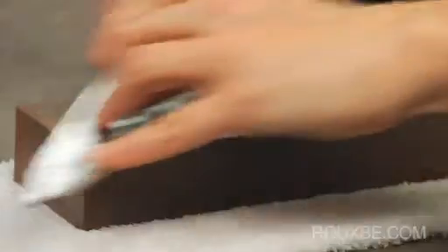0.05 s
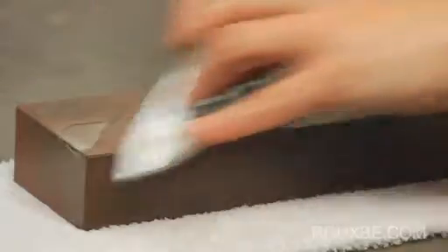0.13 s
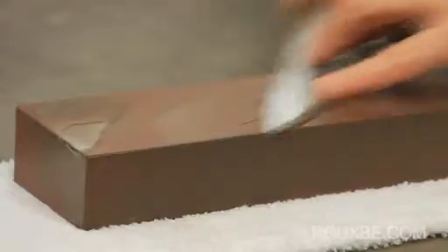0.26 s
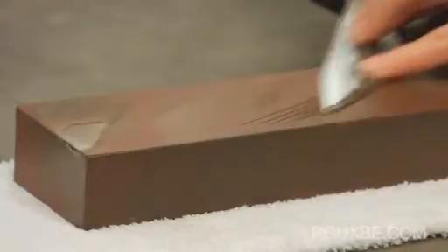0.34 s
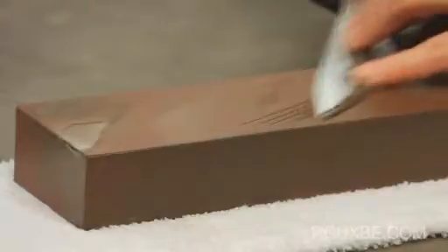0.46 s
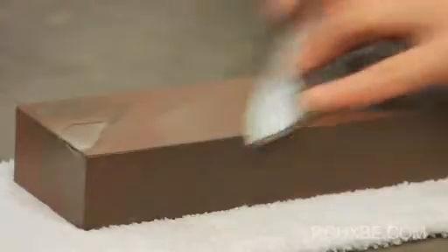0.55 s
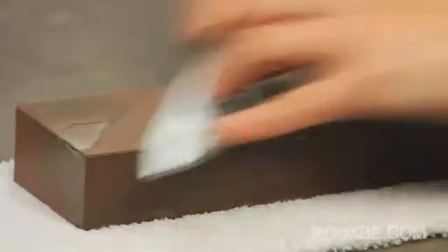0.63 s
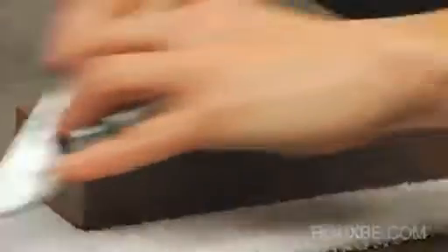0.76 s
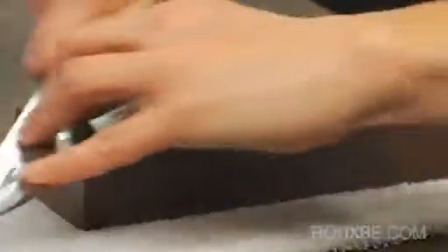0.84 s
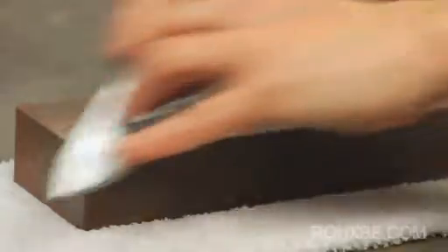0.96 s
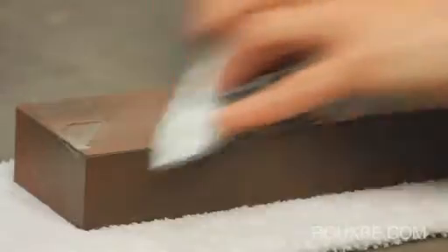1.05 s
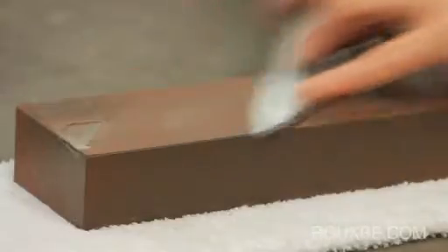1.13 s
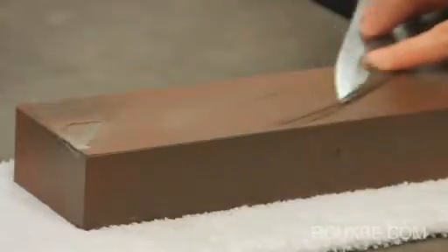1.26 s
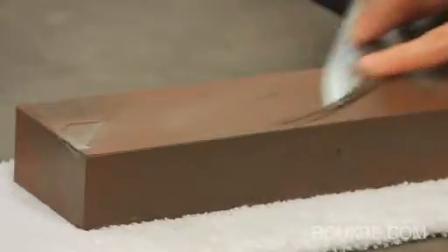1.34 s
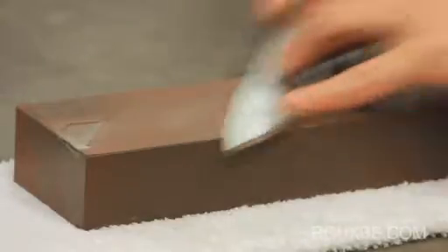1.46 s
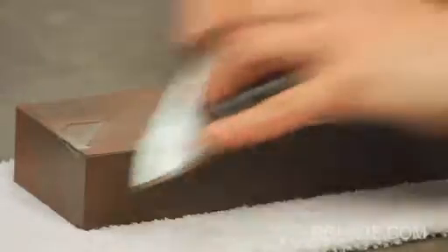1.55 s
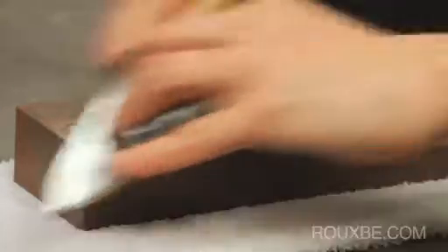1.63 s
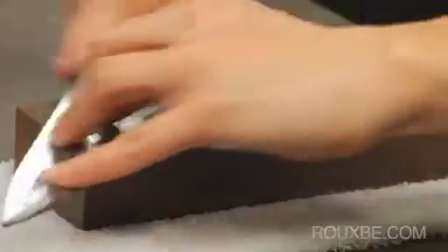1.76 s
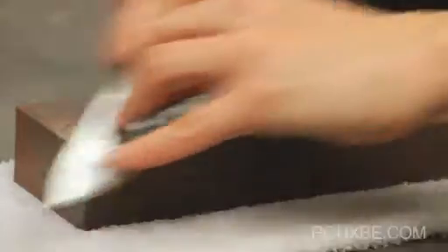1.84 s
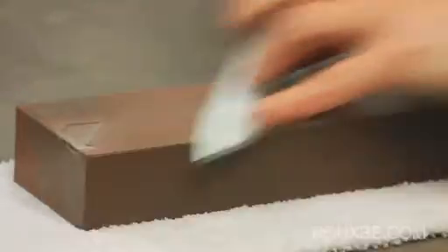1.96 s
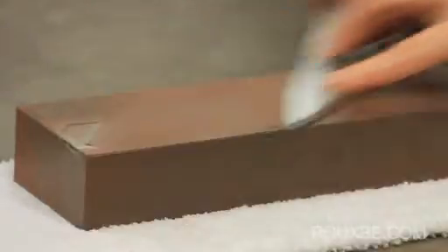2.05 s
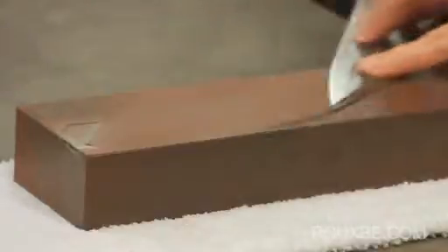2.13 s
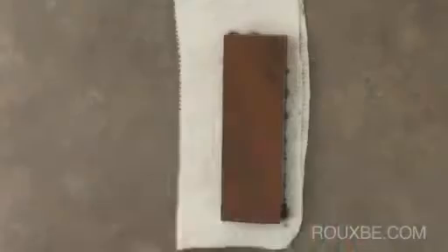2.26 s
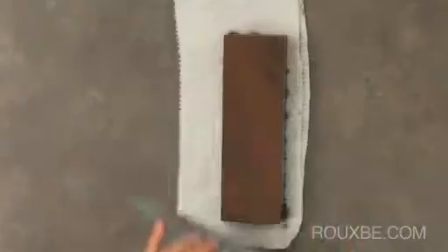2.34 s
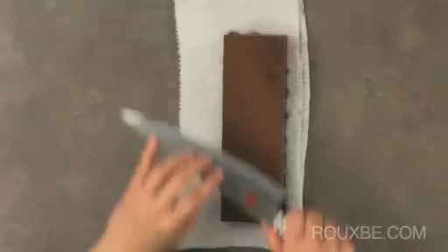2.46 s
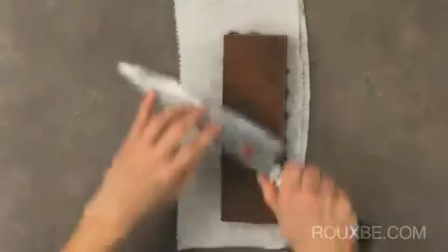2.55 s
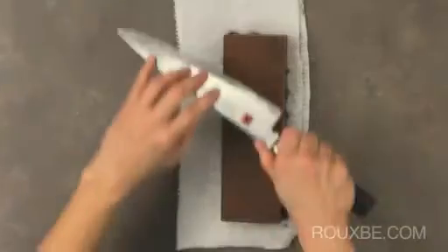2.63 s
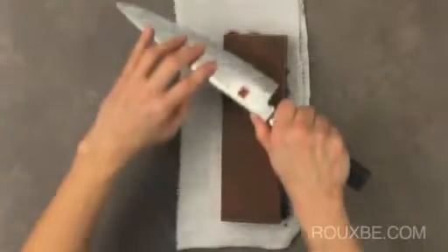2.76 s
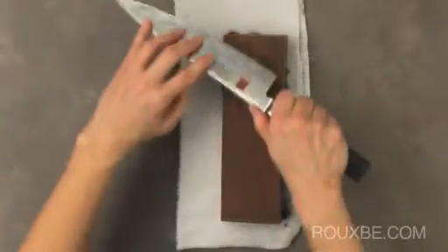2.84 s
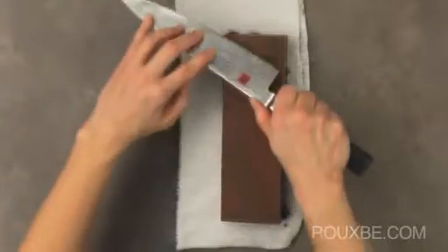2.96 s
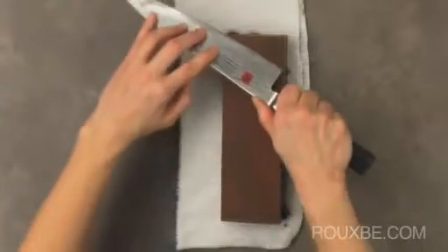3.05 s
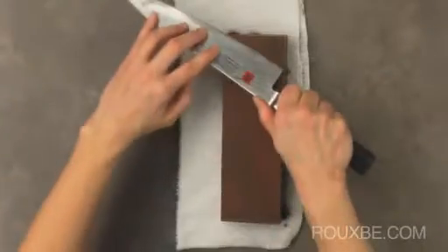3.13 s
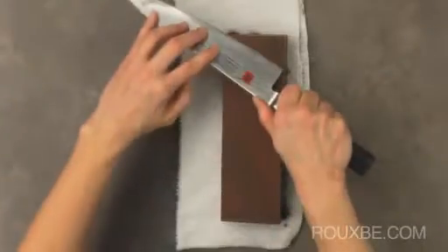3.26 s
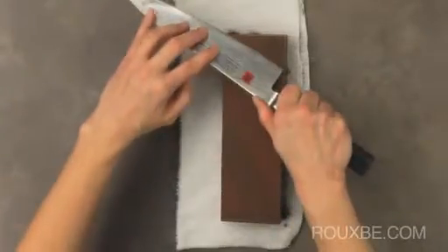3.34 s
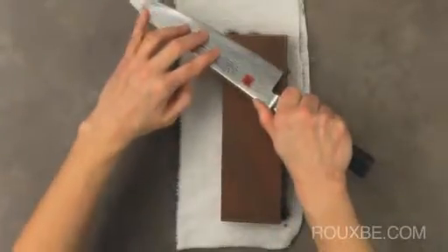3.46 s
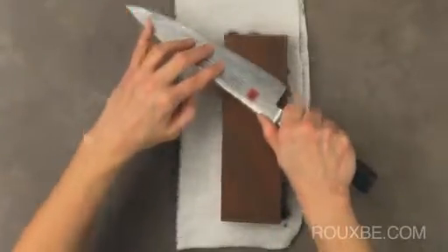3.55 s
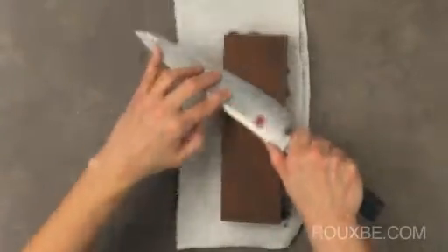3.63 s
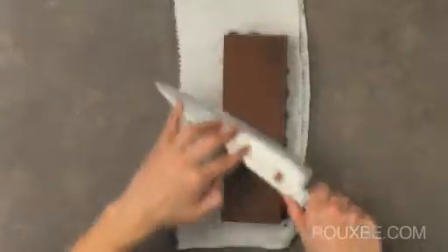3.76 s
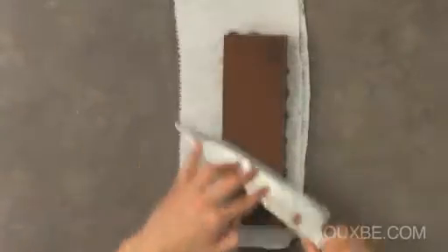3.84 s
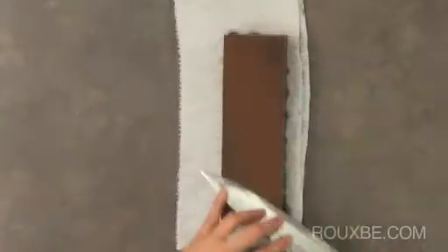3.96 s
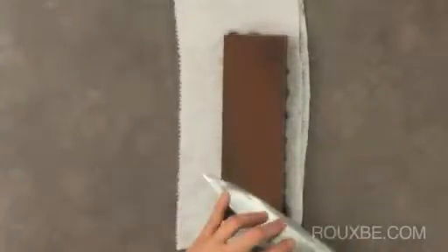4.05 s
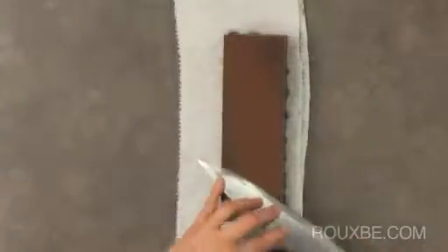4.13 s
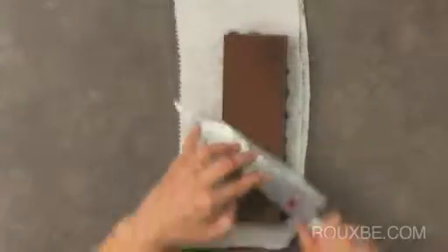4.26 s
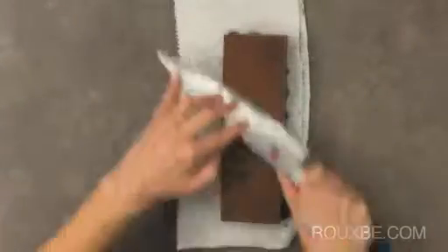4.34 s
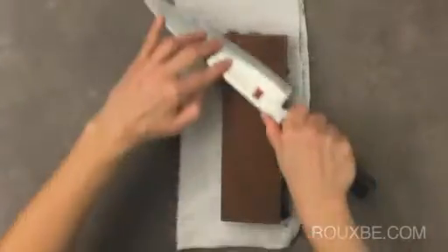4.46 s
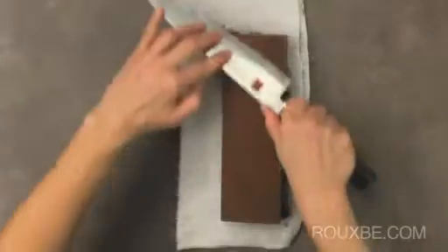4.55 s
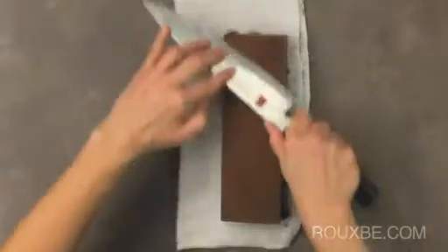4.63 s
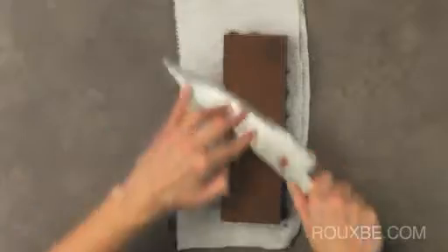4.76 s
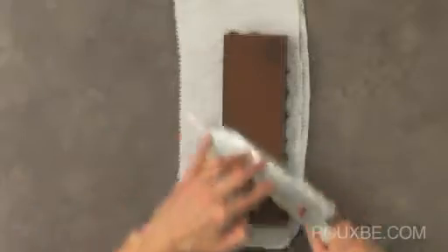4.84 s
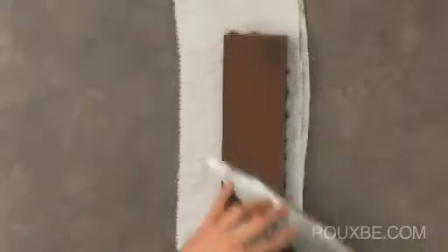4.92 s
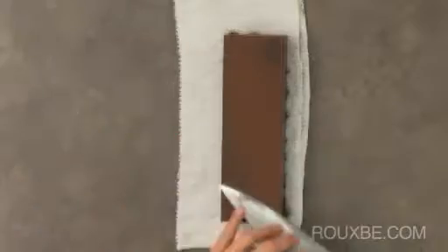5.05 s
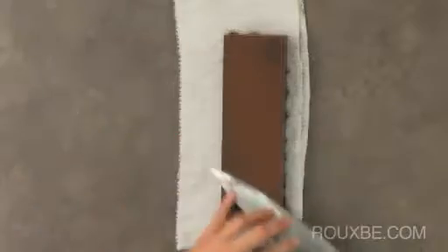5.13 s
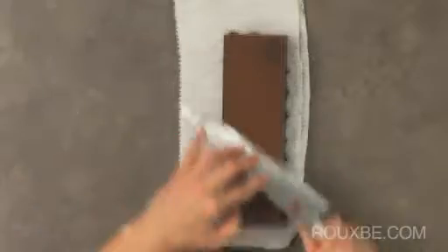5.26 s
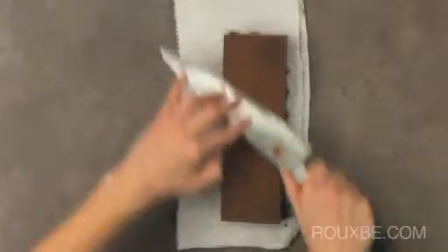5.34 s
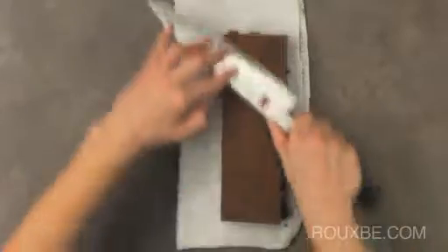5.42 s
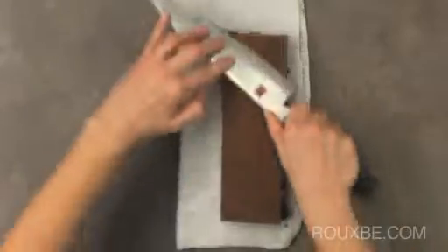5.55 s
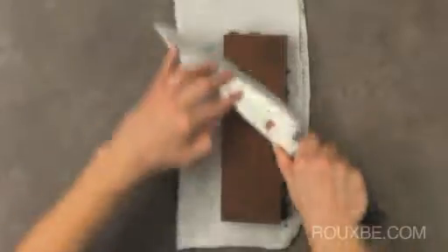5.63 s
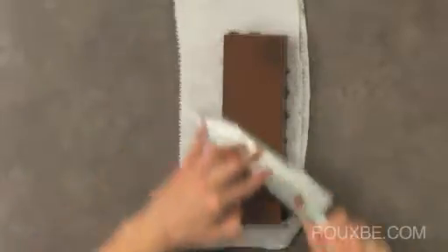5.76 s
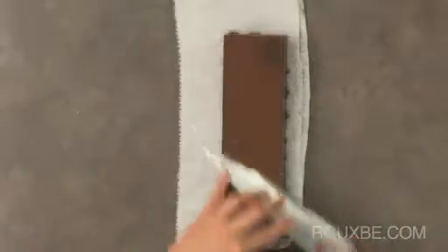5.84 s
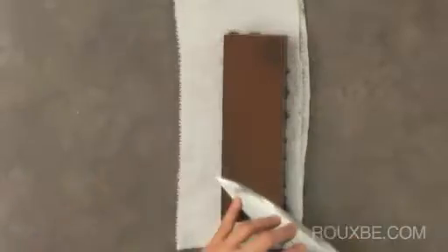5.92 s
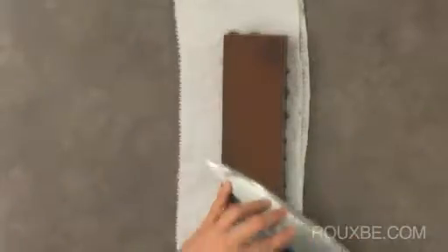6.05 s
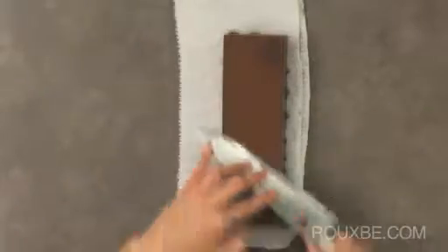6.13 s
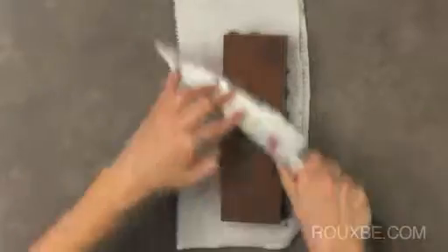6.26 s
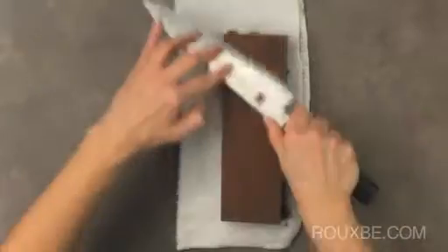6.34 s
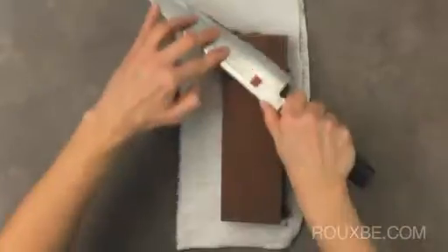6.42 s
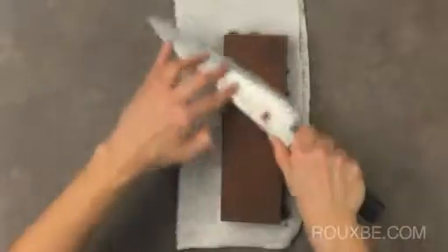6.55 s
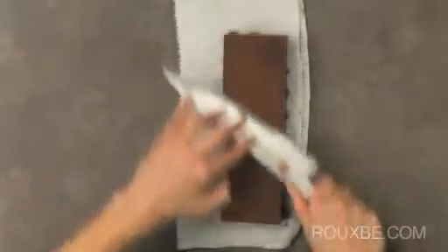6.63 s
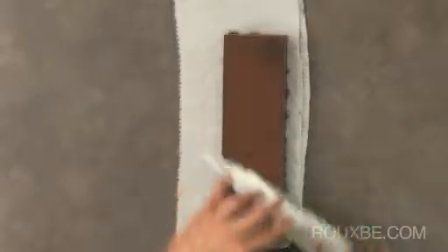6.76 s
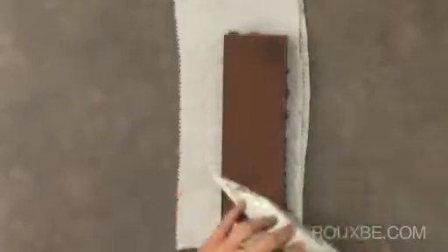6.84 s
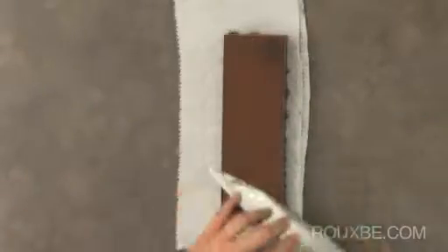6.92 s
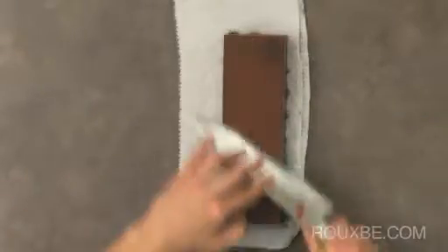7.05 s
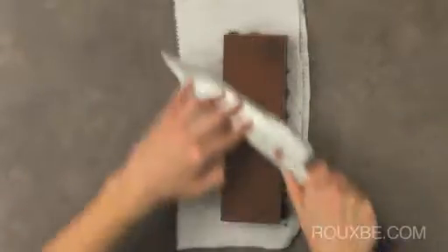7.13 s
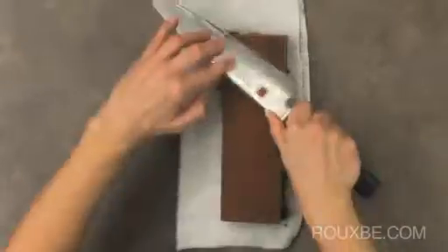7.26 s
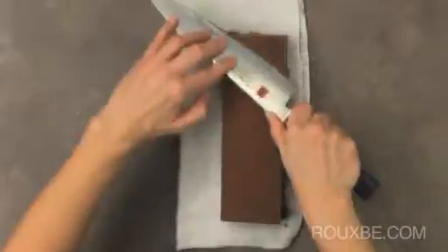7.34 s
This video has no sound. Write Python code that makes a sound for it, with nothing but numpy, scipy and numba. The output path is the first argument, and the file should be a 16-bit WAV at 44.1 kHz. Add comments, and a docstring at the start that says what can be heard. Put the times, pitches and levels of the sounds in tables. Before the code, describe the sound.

In a quiet kitchen, a steel blade rasps to and fro on a wet sharpening stone, close up, about two strokes a second. The scraping stops for a second of faint room hum and soft cloth rustle. A crisp metallic tap with tiny bounces marks the blade landing, then eight gritty strokes follow, alternately full near the heel and thin near the tip, heard from above.

```python
"""A steel knife scrapes to and fro over a wet whetstone in a quiet kitchen: a stroke's tail, then five strokes.
Soft cloth rustles, the blade lands with a tap and small bounces, then eight strokes are heard from above.
Random grit drives edge hiss, blade resonances and slow flex: full near the heel, thin near the tip.
Filtered noise makes the counter rumble, cloth, air and fridge, and two thin tones; decaying modes make the taps."""
import sys
import numpy as np
from scipy import signal
from scipy.fft import rfft, irfft, next_fast_len
from scipy.io import wavfile
from scipy.ndimage import uniform_filter1d
from numba import njit

SR = 44100
rng = np.random.default_rng(int(sys.argv[2]) if len(sys.argv) > 2 else 0)


def file_out(sig):
    """Save sig as 16-bit WAV at sys.argv[1]."""
    # one column per channel
    cols = np.atleast_2d(sig).T
    # limit, then scale
    lim = np.clip(cols, -1, 1)
    pcm = np.round(lim * 32767).astype(np.int16)
    wavfile.write(sys.argv[1], SR, pcm)


N = 325899
CONTROL_STEP = 32  # samples per control value
T = np.arange(0, N + CONTROL_STEP, CONTROL_STEP) / SR
PADDED = next_fast_len(N, True)
HZ = np.fft.rfftfreq(PADDED, 1 / SR) + 1  # offset keeps logs and ratios finite

MOVE_S = 2.23  # microphone goes from the side to above
LIFT_S, LAND_S = 2.26, 3.2  # scrape stops, scrape resumes

# strokes, leaving tip and heel by turns, from the heel after the pause:
# (start [s], pick-up [s], hiss once moving [dB], hiss before braking [dB], braking [s], hiss at rest [dB],
#  body over hiss at start [dB], body over hiss at end [dB], flex over hiss before place and speed terms [dB])
STROKES = [ (-0.4, .03, -40, -43, 0.021, -60.5, -10, 1, -21),
           (0.015, 0.016, -35.5, -48.5, 0.01, -68.5, -4.5, -16, -37),
           (0.464, 0.055, -33.5, -28, 0.018, -57.5, -19, -8, -38.5),
           (0.899, 0.024, -30, -40.5, 0.048, -68.5, -7.5, -16.5, -38.5),
           (1.354, 0.047, -33, -28, 0.029, -62.5, -21, -6, -41.5),
           (1.808, .03, -31.5, -31.5, 0.069, -83, -7.5, -14, -41.5),
           (3.46, 0.065, -28.5, -39.5, .035, -69, -1.5, -8, -28),
           (4.123, 0.026, -34, -28, 0.025, -60.5, -10, -2, -30.5),
           (4.63, 0.021, -32.5, -36.5, 0.014, -65.5, 2, -14, -34),
           (5.125, 0.021, -35.5, -28.5, 0.017, -58.5, -11.5, -0.5, -33),
           (5.591, 0.017, -30.5, -41, 0.012, -68, 1, -13, -33.5),
           (6.042, .022, -36.5, -28.5, 0.017, -62, -13, 0, -31.5),
           (6.517, 0.019, -32, -40, 0.011, -67, 0, -11.5, -31),
           (6.951, 0.027, -32.5, -31.5, 0.021, -65, -10.5, -3, -30.5), ]


def undb(db):
    """Amplitude gain from dB."""
    return 10 ** (np.asarray(db) / 20)


def unit(x):
    """Scale to rms 1."""
    return x / np.sqrt(np.mean(x ** 2))


def shape(points):
    """Gain over HZ from (Hz, dB) points, interpolated in log frequency."""
    hz, db = np.transpose(points)
    return undb(np.interp(np.log(HZ), np.log(hz), db))


def bell(hz, width_hz):
    """Resonance curve, 1 at the centre, 1/2 at half a width away."""
    return 1 / (1 + (2 * (HZ - hz) / width_hz) ** 2)


def above(hz, order):
    """Share passed above a corner, 1/2 at the corner."""
    return 1 / (1 + (hz / HZ) ** order)


def tint(spectrum, gain):
    """Weight a spectrum, return to time and scale to rms 1."""
    return unit(irfft(spectrum * gain, PADDED)[:N])


def colour(x, gain):
    """Filter x and scale to rms 1."""
    return tint(rfft(x, PADDED), gain)


def fine(control):
    """Hold each control value for its samples."""
    return np.repeat(control, CONTROL_STEP)[:N]


def walk(rate_hz):
    """Random levels held 1 / rate_hz, smoothed twice, rms 1."""
    hold = int(len(T) / T[-1] / rate_hz)
    steps = np.repeat(rng.standard_normal(len(T) // hold + 1), hold)
    smooth = uniform_filter1d(uniform_filter1d(steps, hold), hold)
    return unit(smooth[:len(T)])


def swells(rows):
    """Gain of bell-shaped swells (s, peak dB, rise s, fall s), summed in power."""
    power = sum(undb(db) ** 2 * np.exp(-((T - s) / np.where(T < s, rise_s, fall_s)) ** 2)
                for s, db, rise_s, fall_s in rows)
    return np.sqrt(power)


def even(x):
    """Hold the running level of x near 1."""
    span = int(.07 * SR)
    power = uniform_filter1d(uniform_filter1d(x ** 2, span), span)
    return x / np.sqrt(power + 1e-12)


def grit(share, spread_db):
    """Random catches on a share of the samples; their sizes spread exponentially in dB."""
    catches = rng.random(N) < share
    return catches * rng.standard_normal(N) * undb(spread_db * rng.exponential(size=N))


@njit
def svf(x, g, k, gain):
    """State-variable band-pass with a moving centre and gain."""
    y, band, low = np.empty(len(x)), 0., 0.
    for i in range(len(x)):
        c = g[i >> 5]  # one control per 32 samples
        v = (band + c * (x[i] - low)) / (1 + c * (c + k))
        band, low, y[i] = 2 * v - band, low + 2 * c * v, k * v * gain[i >> 5]
    return y


def resonance(x, hz, width_hz, stretch, db):
    """Ring x in a resonance whose centre is hz times stretch."""
    centre_hz = np.minimum(hz * stretch, .45 * SR)
    return svf(x, np.tan(np.pi * centre_hz / SR), width_hz / hz, undb(db))


def motion():
    """Hand speed sets hiss level and loss to slowness; travel sets place (0 heel, 1 tip), body and flex levels."""
    # the scrape swells or sags: (time [s], hiss [dB], body on top [dB], lower body on top of that [dB],
    #  half width to 1/e of the dB [s])
    surges = [(.2, -2.5, 1.5, -4, 0.024), (.27, 6.5, -5.5, 3, 0.047), (.81, 3, -2, 0, 0.047),
              (1.06, 2, -2.5, -1, 0.03), (1.2, 2.5, -5, -0.5, 0.067), (1.66, 0.5, 0.5, 6, .05),
              (1.73, 5, -1.5, 1, 0.025), (1.92, 2.5, 0.5, 1, 0.029), (2.12, 1, -7.5, 0, 0.084),
              (3.68, 1.5, -0.5, 9.5, 0.12), (3.83, 0, 3, 7, 0.043), (3.99, 3.5, -3, 4, 0.024),
              (4.58, -3, 6, 1.5, 0.021), (4.7, 2.5, 0, 5.5, 0.018), (5.3, 5, -2, -2, .03),
              (6.1, 0, 1.5, 1.5, 0.048), (6.57, 1.5, 1.5, 3, 0.038), (7.07, -1.5, 0, -0.5, .04)]
    stop_s = 7.395
    ease = 0.084  # slowing toward both ends of the travel
    pick_power, brake_power = 1.15, 1.32  # above 1 the hand lingers at each turn
    lower_tip_side_db, lower_tip_above_db = 13, -2.5
    flex_tip_db, flex_per_loss = -6, .6  # flex fades toward the tip, outlasts the hiss at each turn
    start, pick_s, first_db, last_db, brake_s, rest_db, body_from_db, body_to_db, flex_db = np.transpose(STROKES)
    end = np.append(start[1:], stop_s)
    end = np.where(start < LIFT_S, np.minimum(end, LIFT_S), end)
    k = np.searchsorted(start, T, side="right") - 1  # current stroke
    gone_s, left_s = T - start[k], np.maximum(end[k] - T, 0)

    along = np.minimum(gone_s / (end - start)[k], 1)
    along = along - ease * np.sin(2 * np.pi * along) / (2 * np.pi)
    from_heel = (k + (T > LIFT_S)) % 2
    place = np.where(from_heel, along, 1 - along)

    surge_db, surge_body_db, lower_db = sum(
        np.outer(db, np.exp(-((T - s) / width_s) ** 2)) for s, *db, width_s in surges)
    lower_db = lower_db + np.where(T < MOVE_S, lower_tip_side_db, lower_tip_above_db) * place ** 2
    full_db = first_db[k] + along * (last_db - first_db)[k] + surge_db

    def slow(s, ramp_s, power):
        """Slowness, 1 at a turn and falling away from it."""
        return np.exp(-(s / np.maximum(ramp_s, .003)) ** power)

    loss_db = ((full_db - rest_db[k - 1]) * slow(gone_s, pick_s[k], pick_power)
               + (full_db - rest_db[k]) * slow(left_s, brake_s[k], brake_power))
    hiss_db = full_db - loss_db + 0.35 * walk(12)  # the hand's weight wanders
    body_db = body_from_db[k] + along * (body_to_db - body_from_db)[k] + surge_body_db
    flex_db = flex_db[k] + flex_tip_db * place + flex_per_loss * loss_db
    return hiss_db, loss_db, place, body_db, lower_db, flex_db


def strokes():
    """The same grit drives the hiss of the edge, the body and the slow flex of the blade."""
    # edge hiss and body colours: (frequency [Hz], level [dB])
    side_colour = [(1180, -48), (2000, -42), (2360, -38.5), (2880, -27.5), (3220, -12), (3930, -8),
                   (4240, -12.5), (4470, -9.5), (11500, 5.5), (15100, 0.5), (15800, -2.5)]
    heel_colour = [(1180, -24.5), (2000, -18.5), (3450, -2.5), (4360, -10), (4960, 4.5), (5600, -4),
                   (7980, -5), (8700, -12), (9820, -1.5), (14600, 2.5), (15800, -13)]
    tip_colour = [(1180, -34), (2000, -60), (2400, -28), (3480, -18), (4280, -8), (4670, -18.5), (8480, 7),
                  (9490, 9.5), (10300, 12), (14500, 2.5), (15800, -7)]
    # resonances of the blade pressed on the stone: (frequency at heel [Hz], width [Hz], climb at tip [ratio],
    #  level from the side [dB], level at heel from above [dB], level at tip from above [dB])
    pressed_modes = [(2316, 140, 0.08, 23, -6, 15), (2970, 290, 0.1, -13, -6.5, 6),
                     (3400, 185, 0.18, -26, 6, -8.5), (4163, 420, 0.09, 10.5, -5.5, 4.5),
                     (4790, 640, 0.17, -0.5, -4.5, -19), (6440, 1100, 0, -3, -14.5, 0.5),
                     (6860, 330, 0.14, -2, -8, -1.5), (8520, 790, 0.09, 3, 15, -26.5),
                     (10450, 230, 0, -4, -9.5, -1), (11750, 1500, 0.05, -5, -1, -3.5),
                     (15400, 1400, 0, -3, 14.5, -13)]
    # lowest bend: (frequency at heel [Hz], width [Hz], climb at tip [ratio])
    lowest_bend = (960, 130, 1.25)
    body_per_loss = 0.23  # a slow edge loses less body than hiss [dB per dB]
    settle_db, settle_drop_db, settle_s = -59.5, 24, 0.048
    settle_body_db, settle_flex_db = 0.5, -8

    hiss_db, loss_db, place, body_db, lower_db, flex_db = motion()
    body_db = body_db + body_per_loss * loss_db
    beside = T < MOVE_S
    sliding = (T < LIFT_S) | (T > LAND_S)
    # the edge drags as it settles
    settling = (T > LIFT_S) & (T < STROKES[6][0])
    drag_db = settle_db - settle_drop_db * (1 - np.exp(-np.abs(T - LAND_S) / settle_s))
    hiss_db = np.where(settling, drag_db, hiss_db)
    body_db = np.where(settling, settle_body_db, body_db)
    flex_db = np.where(settling, settle_flex_db, flex_db)
    place = np.where(settling, 0, place)

    # uneven patches of slurry make the drag flicker
    patches_db = 0.45 * walk(25) + 1.14 * walk(70) + 0.096 * walk(200)
    grains = grit(share=.6, spread_db=-0.4) * fine(undb(patches_db))
    rung = undb(-1) * grains
    waver = np.where(beside, .5, .3)  # in widths of the resonance
    for hz, width_hz, climb, side_db, heel_db, tip_db in pressed_modes:
        db = np.where(beside, side_db, heel_db + place * (tip_db - heel_db))
        # the free length of blade shrinks toward the tip, so resonances climb
        stretch = 1 + climb * place + waver * width_hz / hz * walk(9)
        db = db + min(width_hz / 70, 5.0) * walk(20)
        rung += resonance(grains, hz, width_hz, stretch, db)

    edge, blade, spectrum = [], [], rfft(rung, PADDED)
    upper, lower = above(6180, order=16), above(1700, order=12)
    for points in (side_colour, heel_colour, tip_colour):
        edge.append(tint(spectrum, shape(points) * np.sqrt(upper)))
        blade.append(tint(spectrum, shape(points) * np.sqrt((1 - upper) * lower)))

    # a full body goes with the heel's colour, a thin one with the tip's
    fullness = fine(np.clip((body_db + 14.5) / 21.0, 0, 1))
    hiss, body = (np.where(fine(beside), side, fullness * near + (1 - fullness) * far)
                  for side, near, far in (edge, blade))
    # from the side the heel's body comes through mainly at the fullest moments
    body = np.where(fine(beside), body + 0.24 * fullness ** 2 * (blade[1] - body), body)
    hiss, body = even(hiss), even(body)
    deep = irfft(rfft(body, PADDED) * (1 - above(3670, order=12)), PADDED)[:N]
    body = body + deep * fine(undb(np.where(settling, 0, lower_db)) - 1)
    # a slow, quiet edge is duller
    top = irfft(rfft(hiss, PADDED) * above(10700, order=6), PADDED)[:N]
    hiss = hiss + top * fine(undb(np.clip(0.13 * (hiss_db + 34.5), -9, 0)) - 1)

    # the lowest bend sings on the first careful stroke after landing, then firm fingers damp it
    hz, width_hz, climb = lowest_bend
    bend_db = np.interp(T, [3.4, 3.5, 3.62, 3.8], [4, 24, 20, 4]) + 2.0 * walk(10)
    bend = resonance(grains, hz, width_hz, 1 + climb * place, bend_db) + grains
    flex_band = above(810, order=10) * (1 - above(2670, order=16))
    flex = even(colour(bend, HZ / 1500 * np.sqrt(flex_band)))
    flicker_db = 1.0 * walk(13) + 4.4 * np.exp(-((T - 3.55) / 0.041) ** 2)  # boost while the bend sings

    scrape = hiss + fine(undb(body_db)) * body + fine(undb(flex_db + flicker_db)) * flex
    return fine(sliding * undb(hiss_db)) * scrape


def counter():
    """The push of the hands shakes the stone's low resonance and the counter under it."""
    # the hands lean on the stone: (time [s], peak before wander [dB], half width to 1/e power [s])
    lean_rows = [(0.12, -78.5, 0.056), (1.0, -79.5, 0.12), (1.95, -82, .08), (2.75, -78.5, 0.11),
                 (3.6, -77.5, 0.057), (4.79, -67.5, .06), (5.75, -72, 0.16), (6.68, -74, .12),
                 (7.36, -74, .1)]
    side_db, idle_db, loaded_db = -92, -89.5, -75  # from the side; from above, idle and under strokes
    body = np.sqrt(bell(286, 60) + 0.15 * bell(350, 83)) * above(150, order=4)
    body = body + undb(-19.0) * bell(65, 60)
    steady_db = np.where(T < MOVE_S, side_db, np.where(T < 3.53, idle_db, loaded_db))
    leans = swells([(s, db, width_s, width_s) for s, db, width_s in lean_rows])
    level = np.hypot(undb(steady_db), leans) * undb(2.1 * walk(25))
    return fine(level) * colour(rng.standard_normal(N), body)


def kitchen():
    """Steady noise of air, with fridge resonances, fainter at the first microphone position."""
    # air noise: (frequency [Hz], level before fridge and treble terms [dB])
    air_colour = [(15, -78), (25, -37.5), (91, -17), (119, -1.5), (184, -0.5), (361, -6), (391, -3.5),
                  (526, -5), (570, -12.5), (1030, -5), (1430, -7), (1870, -18), (3470, -12.5), (3970, -18),
                  (15700, -12.5)]
    # fridge resonances: (frequency [Hz], width [Hz], boost [dB])
    fridge_modes = [(131, 26, 0.5), (540, 4.1, 17.5)]
    side_db, above_db = -79, -71
    gain = shape(air_colour) * undb(sum(db * bell(hz, width_hz) for hz, width_hz, db in fridge_modes))
    gain *= 1 - .3 * above(11000, order=6)  # thinner at the very top
    hum = colour(rng.standard_normal(N), gain)
    return hum * fine(undb(np.where(T < MOVE_S, side_db, above_db) + 1.4 * walk(2.17)))


def rustle():
    """Cloth fibres brush softly as the hands come in: sparse grains in coloured swells."""
    # brushes: (time [s], peak [dB], rise [s], fall [s])
    brush_rows = [(2.534, -79, .03, 0.014), (2.644, -66, .03, 0.023), (2.7, -72, .03, .03),
                  (2.758, -68.5, .012, 0.03), (3.04, -83, 0.021, .015)]
    # cloth colour: (frequency [Hz], level [dB])
    cloth_colour = [(120, -27), (200, -7), (1030, -12.5), (2670, -20.5), (3870, -18.5), (6150, -27),
                    (8000, -32), (10400, -64), (17600, -120)]
    return fine(swells(brush_rows)) * colour(grit(share=0.32, spread_db=1.5), shape(cloth_colour))


def taps():
    """Each landing is a short gritty push into the blade's modes; light touches favour the treble."""
    # free modes of the blade: (frequency [Hz], level before hardness tilt [dB], t60 [s])
    free_modes = [(268, -16, 0.12), (307, -16.5, 0.063), (983, -12.5, 0.056), (1296, -7, 0.043),
                  (1717, -5, 0.051), (2590, -8.5, 0.074), (2900, 0, 0.025), (3350, -8.5, 0.032),
                  (3840, -20, 0.091), (4484, -25, 0.079), (4820, -3.5, 0.033), (5980, -10, 0.044),
                  (7200, -14, 0.04), (7480, -4, 0.035), (8380, -3, 0.023), (9600, -23, 0.025),
                  (10160, -9, 0.015), (11150, -12, 0.028), (13200, -12, 0.042), (14130, -27, 0.065),
                  (15000, -26, 0.087), (446, -18.5, 0.039), (5180, -4, 0.032)]
    # the blade lands, bounces and settles:
    # (time [s], peak of the ring before high-pass [dB], hardness [dB per octave], scrape t60 [s])
    landings = [(3.1735, -25.5, -2, 0.0026), (3.195, -40.5, 6, .012), (3.216, -53, 13, .01),
                (3.224, -52, -8, 0.0093), (3.259, -53, 3, .012), (3.291, -57, 12, .008),
                (3.308, -55, 10, 0.011), (3.359, -51, 6, 0.079), (3.441, -61.5, 15.5, .01),
                (3.457, -58, 16.5, 0.049)]
    out = np.zeros(N + SR)
    t = np.arange(SR // 6) / SR
    hz, db, t60_s = np.transpose(free_modes)[:, :, None]
    for s, peak_db, tilt_db, scrape_s in landings:
        sign = rng.choice([-1, 1], size=hz.shape)
        level = undb(db + tilt_db * np.log2(hz / 2000)) * sign
        ring = np.sum(level * np.sin(2 * np.pi * hz * t) * 1000. ** (-t / t60_s), axis=0)
        push = rng.standard_normal(size=len(t)) * 1000. ** (-t / max(scrape_s, 1e-4))
        push[0] = 6.0  # first contact
        crack = rng.standard_normal(size=len(t)) * 1000. ** (-t / (scrape_s + .02))
        hit = signal.fftconvolve(ring, push)[:len(t)]
        hit = hit / np.max(np.abs(hit))
        hit = hit + undb(-19.5 + 1.6 * tilt_db) * np.diff(crack, append=0) / 2
        first = int(s * SR)
        out[first:first + len(t)] += undb(peak_db) * hit
    # the thin blade sheds no deep bass
    return signal.sosfilt(signal.butter(2, 170, "high", fs=SR, output="sos"), out[:N])


def sing():
    """The creeping edge keeps two blade modes ringing faintly: narrow noise around the first stroke from above."""
    # thin tones: (frequency [Hz], width [Hz], peak level [dB])
    thin_tones = [(3330, 60, -72), (5260, 50, -75)]
    # their swell: (peak time [s], rise [s], fall [s])
    tone_swell = (3.46, .05, .05)
    s, rise_s, fall_s = tone_swell
    return sum(fine(swells([(s, db, rise_s, fall_s)])) * colour(rng.standard_normal(N), bell(hz, width_hz))
               for hz, width_hz, db in thin_tones)


def scene():
    """One microphone feeds both channels."""
    mid = strokes() + counter() + kitchen() + rustle() + taps() + sing()
    return np.array([mid, mid])


def record(dry):
    """The recorder cuts the top: steep elliptic low-pass at 15.8 kHz."""
    return signal.sosfilt(signal.ellip(12, .2, 80, 15800, fs=SR, output="sos"), dry)


dry = scene()
out = record(dry)
file_out(out)
```